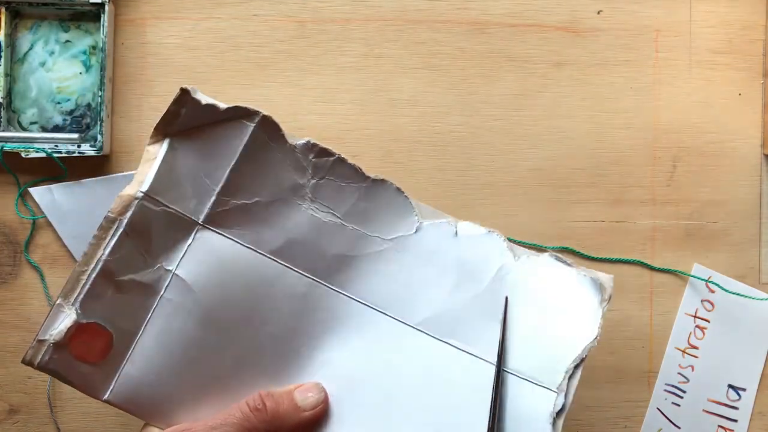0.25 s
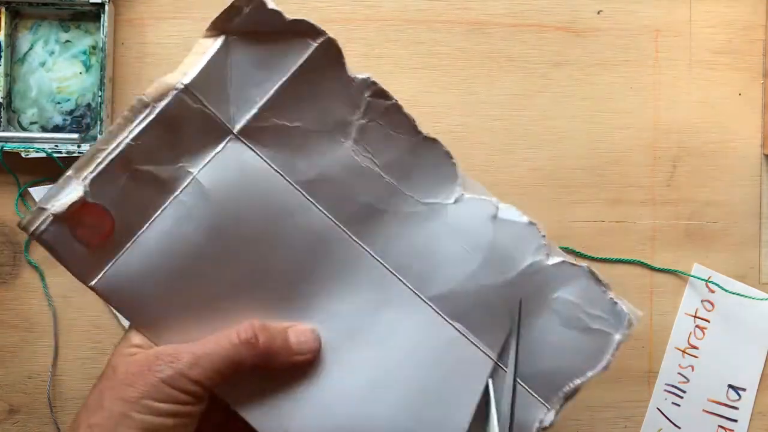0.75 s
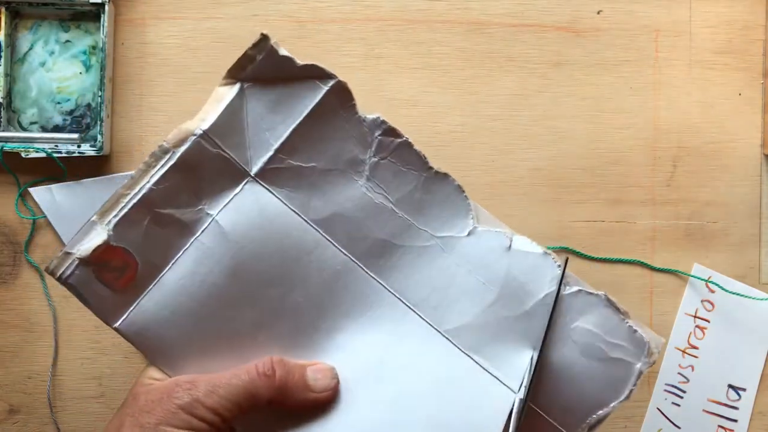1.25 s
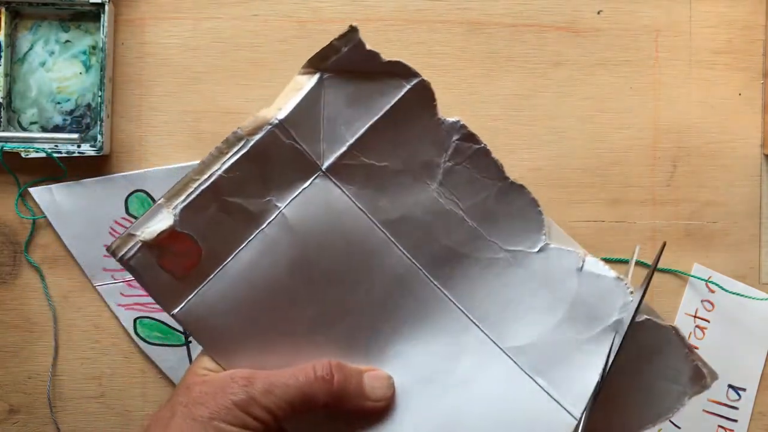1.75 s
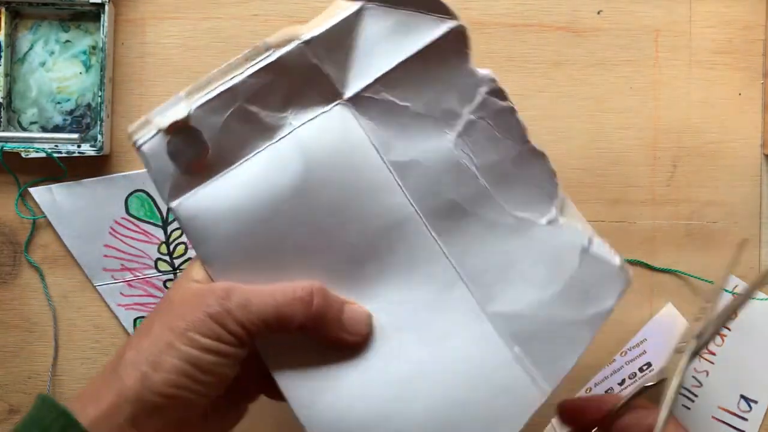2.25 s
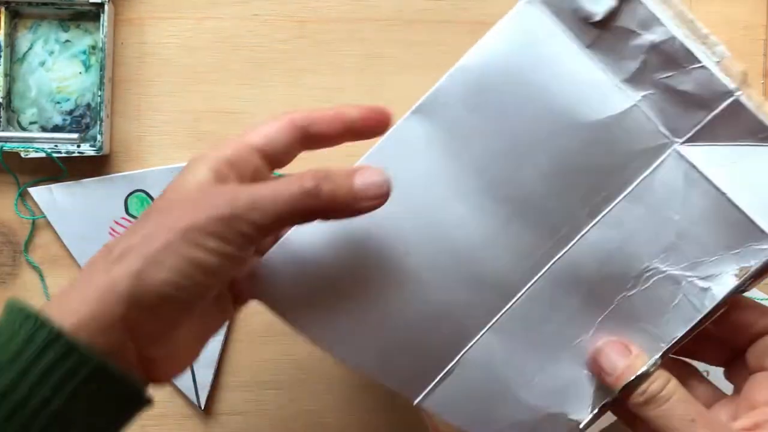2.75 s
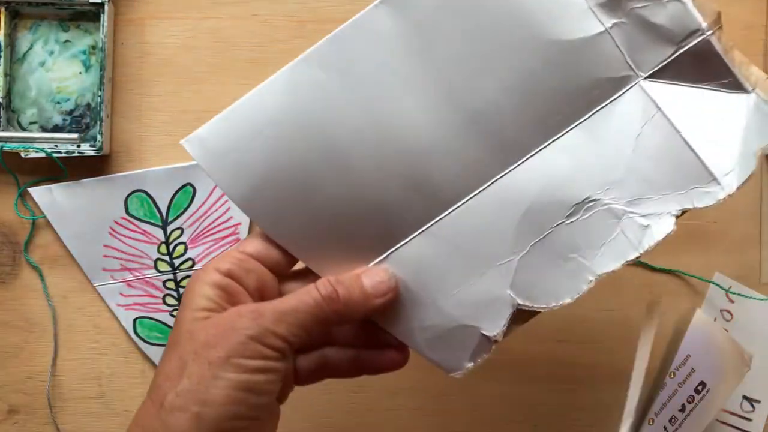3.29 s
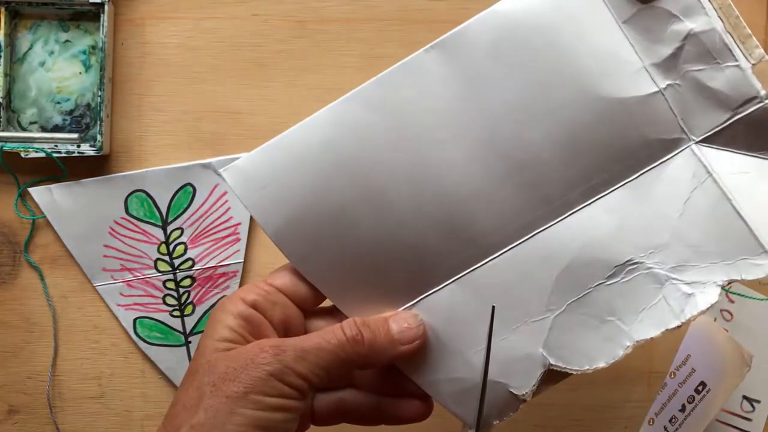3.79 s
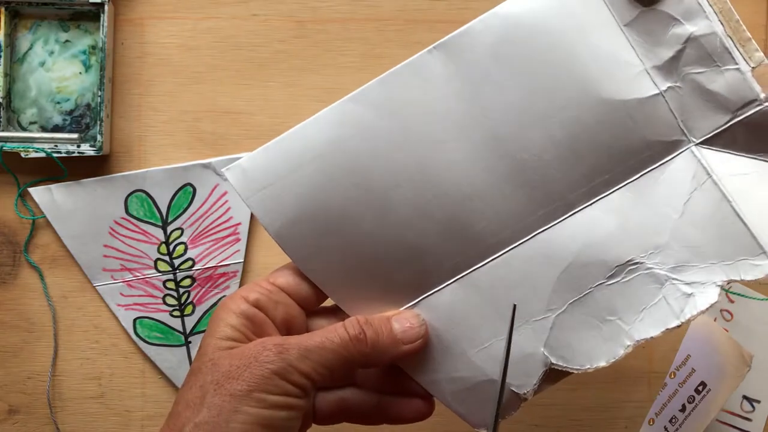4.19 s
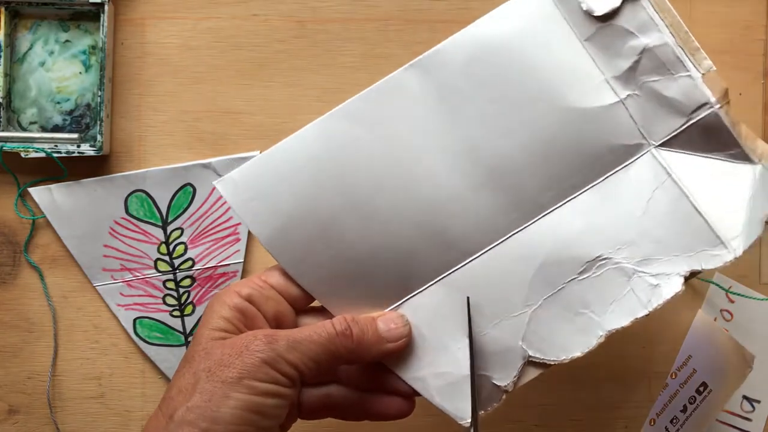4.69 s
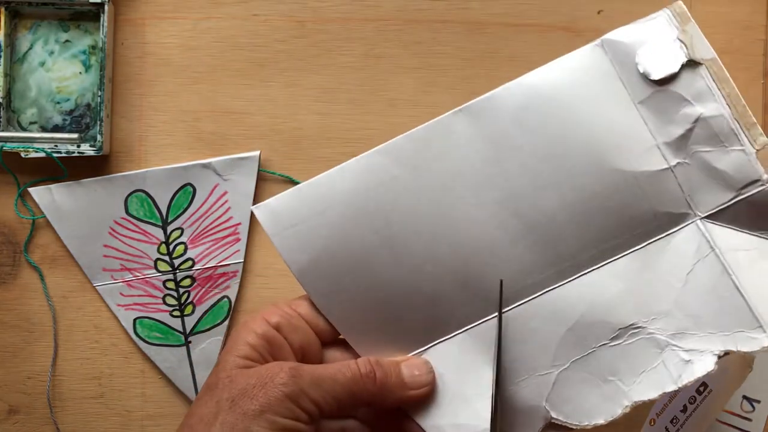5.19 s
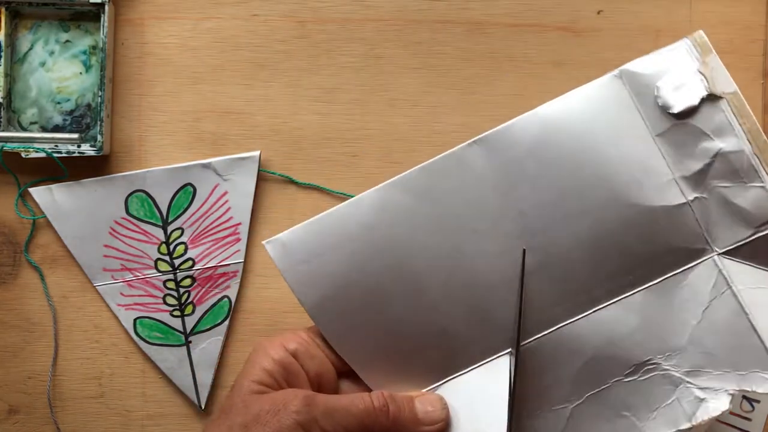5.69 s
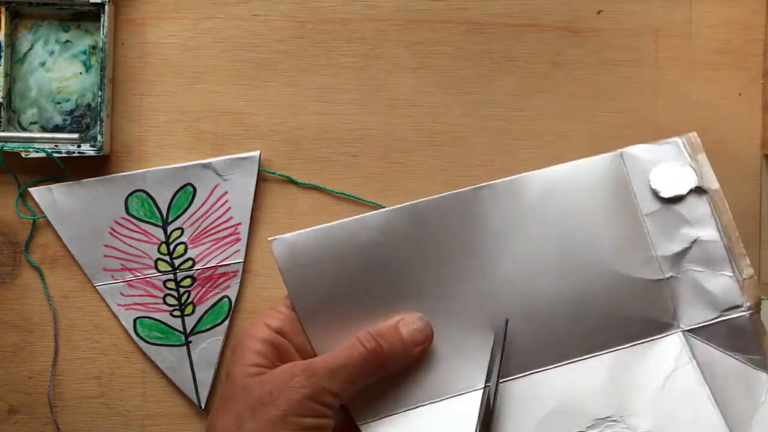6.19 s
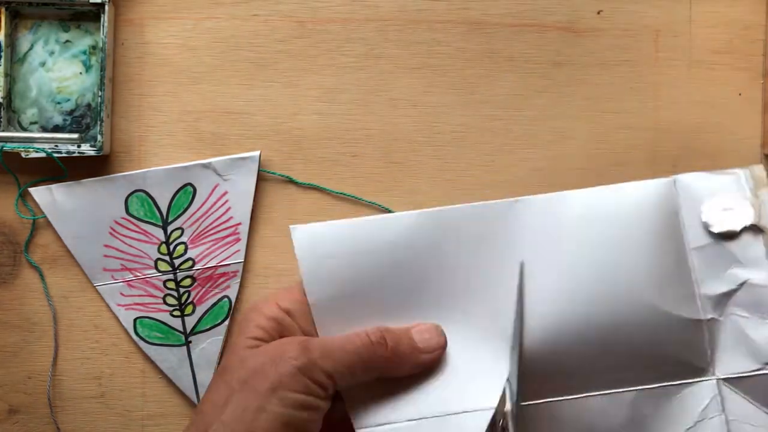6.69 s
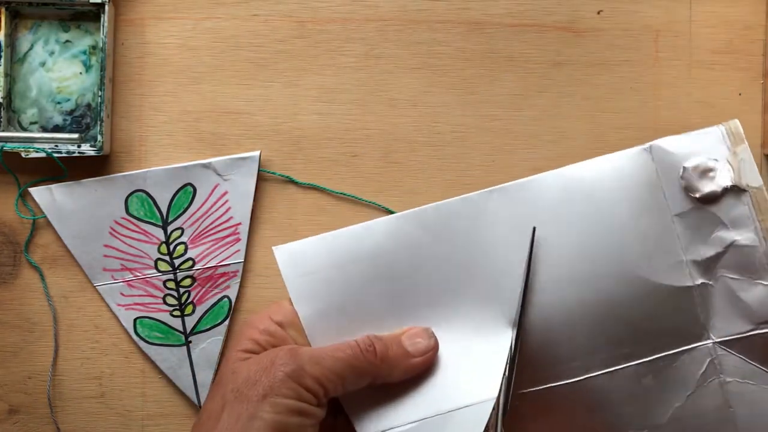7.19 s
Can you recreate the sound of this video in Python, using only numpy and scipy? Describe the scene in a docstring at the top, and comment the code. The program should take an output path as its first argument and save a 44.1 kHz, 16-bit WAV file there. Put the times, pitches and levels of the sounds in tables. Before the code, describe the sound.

A close indoor take of scissors cutting stiff folded carton over a wooden table. From 0 to 0.25 s a rapid cluster of sharp crackles tears forward, then more short crunches and dry scrapes around 0.4 to 1 s. Stronger crackles come at 1.35 to 1.5 s and again near 1.9 s. At 2.1 s the blades snap shut, very loud, bright and steely, followed by hollow wooden knocks and low thumps until 2.3 s. Handling rustles at 2.6 s; the sheet bumps the table around 2.95 to 3.1 s. It is sparse and quiet until 4.5 s, when crunching returns, with a dense burst at 5.2 to 5.35 s. Scrapes and crackles continue, a smaller snip and thump land at 6.2 s, rubbing follows, and a final crackling flurry runs 7.2 to 7.4 s. Faint rapid ticking and a low hush persist.

```python
"""Quick crackling jerks and dry scraping open the scene: scissors cut stiff folded carton above a wooden table.
Noise bursts through card resonances make the tearing; gusty grit through the same card makes the scrape.
The blades snap shut twice as ringing steel, and the sheet knocks and booms on the table's modes.
Behind it lie a small room's short tail, a faint steady ticking and a bass-heavy hush."""
import sys
import numpy as np
from scipy import signal
from scipy.fft import rfft, irfft
from scipy.io import wavfile
from scipy.ndimage import uniform_filter1d

SR = 44100
rng = np.random.default_rng(int(sys.argv[2]) if len(sys.argv) > 2 else 0)


def unload_audio(sound):
    """Save the sound as a 16-bit wav file, at the path given as the first command line argument."""
    columns = np.transpose(np.atleast_2d(sound))
    # keep every value between -1 and 1, then stretch to whole-number steps
    steps = np.round(np.clip(columns, -1, 1) * 32767)
    wavfile.write(sys.argv[1], SR, steps.astype(np.int16))


N = 328545


def undb(db):
    """Gain of a level in dB."""
    return 10 ** (np.asarray(db) / 20)


def ring(x, hz, width_hz):
    """One resonance, gain 1 at its centre."""
    return signal.lfilter(*signal.iirpeak(hz, hz / max(width_hz, 5), fs=SR), x)


def body(x, modes):
    """A struck or rubbed object: a bank of resonances with alternating sign."""
    out = np.zeros(len(x))
    for k, (hz, width_hz, db) in enumerate(modes):
        out += (-1) ** k * undb(db) * ring(x, hz, width_hz)
    return out


def patchy(x, modes, depth_db, rate):
    """A bank of resonances whose levels wander apart as grip and bend change."""
    out = np.zeros(len(x))
    for k, (hz, width_hz, db) in enumerate(modes):
        wandering = undb(db + depth_db * walk(rate))
        out += (-1) ** k * wandering * ring(x, hz, width_hz)
    return out


def rms(x, db=0):
    """Scale to an rms level in dB."""
    return x * undb(db) / np.sqrt(np.mean(x ** 2))


def peak(x, db):
    """Scale to a peak level in dB."""
    return x * undb(db) / np.max(np.abs(x))


def dull(x, hz, order=2):
    """Low-pass."""
    return signal.sosfilt(signal.butter(order, hz, fs=SR, output="sos"), x)


def walk(rate):
    """Random levels held for 1 / rate seconds, then slewed into ramps; spread a little under 1."""
    hold = int(SR / rate)
    steps = np.repeat(rng.standard_normal(N // hold + 1), hold)
    return uniform_filter1d(steps, hold)[:N]


def push(noise, ms):
    """Noise under a rounded swell that lasts about ms."""
    u = np.arange(len(noise)) / SR / (max(ms, .2) / 2500)  # 1 at the top of the swell
    return noise * (u * np.exp(1 - u)) ** 2


def add(out, s, x):
    """Mix x into out from time s."""
    i = int(s * SR)
    out[i:i + len(x)] += x[:len(out) - i]


# The cut jerks forward. Each row: start in seconds, crackle level in dB, panel pitch in Hz,
# panel level in dB over the crackle, tear length in ms.
JERKS = [(0.0495, -22.5, 780, -2.5, 12), (0.063, -17.5, 710, -6.5, 7.5), (0.0824, -25, 730, -4, 5.2),
         (0.0947, -18, 763, -0.5, 8.4), (0.1222, -14, 749, 9, 8.4), (0.1605, -12, 758, -3, 3.95),
         (0.211, -19.5, 537, -10, 5.9), (0.4344, -17, 534, -30, 1.74), (0.4484, -20.5, 1250, -8, 5.3),
         (0.4936, -17, 512, -8, 7.7), (0.5814, -33, 543, -5, 5.5), (0.62, -35.5, 1190, -6, 5.6),
         (0.7264, -40, 715, 6.5, 4.9), (0.9707, -30, 654, -6.5, 2.1), (1.0025, -26.5, 750, -7, 14.5),
         (1.3384, -24.5, 745, -10, 10), (1.3747, -17.5, 723, -10, 6), (1.3942, -18, 750, -6, 11.3),
         (1.4454, -10.5, 1084, -10, 10.4), (1.4775, -30.5, 730, 1.5, 5.8), (1.6658, -22.5, 610, -6.5, 6.9),
         (1.9135, -21, 700, -12.5, 10.4), (1.9466, -18.5, 784, -1.5, 5.7), (1.9724, -30, 750, -22, 4.2),
         (2.6538, -27.5, 770, -2, 10), (3.0811, -32, 580, -7.5, 5), (3.5822, -37, 690, -10, 8.4),
         (4.138, -42, 743, 1, 5.3), (4.5096, -25.5, 720, -22, 5.5), (4.5381, -29, 680, -7.5, 8.5),
         (4.568, -35, 670, -5.5, 8), (4.6069, -30.5, 775, -13, 11), (4.6808, -21, 720, 1, 11.8),
         (4.6917, -21.5, 739, 2.5, 7.6), (4.7234, -28, 1107, -14, 7.4), (5.1672, -63, 684, 0, 6),
         (5.226, -23, 740, -8, 8.6), (5.2472, -15, 1140, -36, 6.1), (5.2614, -18.5, 760, -2.5, 21),
         (5.2744, -16.5, 744, -2.5, 5.8), (5.2909, -10, 764, -9.5, 9.1), (5.3163, -20, 1040, -5, 2.6),
         (5.3353, -18.5, 1130, -0.5, 7.4), (5.585, -25.5, 1110, -5, 2.7), (5.8356, -18, 705, -14, 8.4),
         (5.91, -16, 1006, -0.5, 5.2), (5.9455, -21, 757, -4.5, 8.3), (6.0112, -32, 740, -8, 4),
         (6.0273, -23, 525, -15.5, 6.2), (6.1386, -26.5, 510, -1, 4.1), (6.356, -38.5, 525, 0, 4.7),
         (6.4268, -32.5, 740, -10, 5.1), (7.1761, -18, 660, -10.5, 5.8), (7.215, -29, 790, -16, 6.9),
         (7.2426, -18.5, 710, -10, 8.7), (7.28, -21.5, 770, -8.5, 7.1), (7.3282, -24.5, 764, 0, 3.6),
         (7.352, -12.5, 550, -10.5, 5.3), (7.3796, -23, 750, 8.5, 3.4), (7.4026, -27, 765, 8.5, 5.2)]
# Resonances of the stiff card. Each row: centre in Hz, width in Hz, level in dB.
CARD_MODES = [(1653, 830, -4), (2324, 53, 5.5), (2580, 75, -5.5), (3470, 575, 5.5), (3890, 1370, 1.5),
              (6600, 2320, -4.5), (8450, 830, -3)]
# Resonances of the free carton panel. Each row: centre in Hz, width in Hz, level in dB.
PANEL_MODES = [(672, 179, -1), (741, 78, 3.5), (1119, 140, -6.5), (390, 270, -6.5), (206, 140, -8)]
# The card's brightest pitch drifts with where it is held and cut. Each row: time in seconds, pitch in Hz.
BRIGHT_PITCH = [(0, 6140), (0.25, 4810), (0.45, 3240), (1.2, 2870), (2, 2240), (2.6, 4110), (3, 2110),
                (5, 2220), (7.45, 2054)]
BRIGHT_SCATTER = .2  # each jerk lands about this share off the brightest pitch
CARD_TOP_HZ = 8970


def bright_hz(s):
    """The card's brightest pitch in Hz at time s, gliding between the listed points."""
    return np.interp(s, *np.transpose(BRIGHT_PITCH))


def slips():
    """Each jerk tears fibres for a few ms; the card crackles and the free panel rings."""
    out = np.zeros(N)
    noises = rng.standard_normal((len(JERKS), 4096))
    for (s, db, panel_hz, panel_db, ms), noise in zip(JERKS, noises):
        hz = bright_hz(s) * np.exp(BRIGHT_SCATTER * noise[-2])  # a late noise sample serves as the scatter
        tear = push(noise, ms)
        crackle = peak(body(tear, CARD_MODES), 0) + peak(ring(tear, hz, hz / 6), -0.25)
        crackle = crackle + peak(body(tear, PANEL_MODES[3:]), -18.0)  # a little low body
        panel_note = ring(ring(tear, panel_hz, 270), panel_hz, 84)
        panel = peak(panel_note, 0) + peak(body(tear, PANEL_MODES[:3]), -5.0)
        add(out, s, peak(crackle, db) + peak(panel, db + panel_db))
    return dull(out, CARD_TOP_HZ, order=3)


# Blades and fingers rub the card. Each row: start in seconds, firmest moment in seconds, end in seconds,
# hiss level in dB at the firmest, panel level in dB over the hiss.
RUBS = [(0, 0.026, 0.06, -50.5, -7), (0.04, 0.063, 0.24, -43, -8), (0.364, 0.418, 0.43, -51.5, 1),
        (0.422, 0.441, 0.485, -31, -5), (0.473, 0.487, 0.545, -43, 4.5), (0.638, 0.667, 0.667, -34, -12),
        (0.664, 0.673, 0.78, -36.5, -6), (0.76, 0.791, 0.9, -37, -3.5), (0.888, 0.923, 0.937, -40.5, -3.5),
        (0.939, 0.975, 0.99, -44.5, -1.5), (0.982, 1.015, 1.145, -43.5, -1.5),
        (1.171, 1.193, 1.215, -49.5, -1.5), (1.22, 1.258, 1.31, -45, -2), (1.316, 1.34, 1.38, -45.5, -4),
        (1.445, 1.475, 1.51, -57, 8), (1.632, 1.649, 1.83, -46.5, 1), (1.899, 1.98, 1.99, -36, -1.5),
        (2.215, 2.356, 2.45, -53.5, -2.5), (2.567, 2.586, 2.62, -48, -2), (2.607, 2.64, 2.785, -43, -10),
        (2.938, 2.955, 3.22, -43.5, 0.5), (3.577, 3.624, 3.76, -52, -4.5), (3.914, 3.928, 3.95, -58, -9),
        (4.07, 4.091, 4.11, -53.5, -3.5), (4.129, 4.16, 4.25, -55, -1), (4.298, 4.517, 4.59, -46.5, -5),
        (4.597, 4.646, 4.67, -43, -3.5), (4.656, 4.704, 4.76, -43, 0.5), (4.911, 4.958, 5.07, -39.5, -11),
        (5.032, 5.099, 5.14, -52.5, 6), (5.156, 5.204, 5.23, -51.5, -2), (5.215, 5.28, 5.4, -37, -2.5),
        (5.535, 5.578, 5.66, -36.5, -6.5), (5.656, 5.736, 5.775, -49, 4.5), (5.79, 5.826, 5.84, -49.5, -5),
        (5.828, 5.862, 5.91, -34, -5), (5.876, 5.934, 5.97, -35.5, 1.5), (6.004, 6.05, 6.11, -39.5, -8.5),
        (6.081, 6.126, 6.15, -37.5, -3), (6.149, 6.201, 6.233, -40.5, 7), (6.22, 6.293, 6.43, -52, 11),
        (6.429, 6.465, 6.492, -38.5, 2.5), (6.507, 6.596, 6.62, -45, 0.5), (6.611, 6.662, 6.7, -48, 4),
        (6.676, 6.743, 6.84, -36, 0.5), (6.8, 6.883, 6.93, -48.5, 3.5), (6.93, 6.99, 7.06, -47.5, -0.5),
        (7.116, 7.143, 7.18, -47.5, -20), (7.159, 7.19, 7.32, -41.5, -3.5), (7.313, 7.38, 7.45, -38.5, 1)]
TOUCH_S, LIFT_S = 0.0075, .015  # contact is made quickly and lost more slowly
SWELL_DB, FADE_DB = 10, 13.5  # how far under its firmest a stroke starts and ends


def scrape():
    """Dense tiny fibre clicks of uneven size, in gusts, coloured by card and panel."""
    gusts_db = 1.8 * walk(900) + 1.3 * walk(90) + .7 * walk(30)
    grit = rng.standard_normal(N) * undb(gusts_db)
    # thick fibres snap well above the rest: about 250 grains a second are six times as strong
    grit = grit * (1 + 5.0 * (rng.random(N) < 250 / SR))
    card = rms(patchy(grit, CARD_MODES, 2.2, 30))
    panel = rms(patchy(grit, PANEL_MODES, 2.2, 22))
    out = np.zeros(N)
    for start, firmest, end, db, panel_db in RUBS:
        hz = bright_hz((start + end) / 2)
        i, j = int(max(start, 0) * SR), min(int(end * SR), N)
        t = np.arange(j - i) / SR
        contact = np.minimum(1, t / TOUCH_S) * np.minimum(1, (t[-1] - t) / LIFT_S)
        pressure_db = np.interp(start + t, [start, firmest, end], [db - SWELL_DB, db, db - FADE_DB])
        hiss = card[i:j] + rms(ring(grit[i:j], hz, hz / 6), -7)
        rub = rms(hiss) + undb(panel_db) * panel[i:j]
        out[i:j] += contact * undb(pressure_db) * rub
    return dull(out, CARD_TOP_HZ, order=3)


# The blades snap shut. Each row: start in seconds, snap level in dB, then panel, last fibres and shiver,
# each in dB over the snap level.
SNAPS = [(2.0991, 8.5, -20.5, -20, -21.5), (6.2129, -1.5, -13, -8.5, -22.5)]
# Resonances of the steel blades. Each row: centre in Hz, width in Hz, level in dB.
BLADE_MODES = [(2010, 880, -10), (3600, 200, -13.5), (4490, 770, -2), (6260, 770, -5.5), (7740, 2200, -7),
               (8300, 5500, -16.5), (14300, 1000, -25.5)]


def snips():
    """The last fibres give way just before the steel meets; blades and panel ring, the freed sheet shivers."""
    out = np.zeros(N)
    t = np.arange(8192) / SR
    noises = rng.standard_normal((len(SNAPS), 3, len(t)))
    for (s, db, panel_db, fibre_db, shiver_db), noise in zip(SNAPS, noises):
        fibres = dull(body(push(noise[0], 12.0), CARD_MODES), CARD_TOP_HZ)
        add(out, s, peak(fibres, db + fibre_db))
        blow = push(noise[1], .7) + 0.12 * push(noise[1], 5.5)
        blades = peak(body(blow, BLADE_MODES), db + 1.5)
        panel = peak(body(blow, PANEL_MODES), db + panel_db)
        # the shiver falls 60 dB in 0.17 s, fluttering on the way
        flutter = undb(-60 * t / 0.17 + 4.1 * walk(130)[:len(t)])
        shiver = dull(ring(noise[2], 3500, 8800), 9700, order=4) * flutter
        add(out, s + 0.006, blades + panel + peak(shiver, db + shiver_db))
    return out


# The sheet knocks on the table. Each row: start in seconds, peak level in dB, pitch in Hz, contact in ms.
SHEET_KNOCKS = [(2.168, -9.5, 491, 11.7), (2.181, -17, 260, 6.5), (2.261, -14, 502, 14.5),
                (2.293, -23, 508, 5.8), (2.314, -34, 477, 14), (2.946, -14.5, 521, 14.4),
                (2.973, -14, 474, 6.2), (3.033, -29, 280, 22.3), (6.224, -19.5, 392, 9),
                (6.301, -27, 318, 10)]
# Resonances of the wooden table. Each row: centre in Hz, width in Hz, level in dB.
TABLE_MODES = [(177, 77, 0), (308, 51, 4.5), (489, 38, 11), (677, 90, 4), (1790, 800, -15.5)]
# Sheet and hands thump the table top. Each row: start in seconds, peak level in dB, push length in ms.
THUMPS = [(1.385, -38.5, 41), (1.427, -59, 22), (1.912, -41, 64), (2.105, -26, 38), (2.171, -13.5, 10),
          (2.273, -19.5, 14), (2.296, -33, 94), (2.954, -28.5, 54), (3.008, -23, 38), (3.064, -23, 17.3),
          (3.107, -28, 61), (6.146, -26.5, 17), (6.228, -18, 16.6), (6.243, -26, 51), (6.545, -37, 10),
          (6.622, -40, 29), (7.23, -34.5, 30), (7.345, -37, 25)]
BOOM_HZ = 103.3


def table():
    """Knocks ring the table's modes and rumble on; slower pushes swing its lowest modes."""
    out = np.zeros(N)
    noises = rng.standard_normal((len(SHEET_KNOCKS), 8192))
    for (s, db, hz, ms), noise in zip(SHEET_KNOCKS, noises):
        blow = push(noise, ms) + 0.14 * push(noise, 5.4 * ms)
        # the bent sheet adds its own note to the table's
        note = peak(ring(ring(blow, hz, 29.6), hz, 260), 0)
        wood = peak(dull(body(blow, TABLE_MODES), 2700), 7.5)
        add(out, s, peak(note + wood, db))
    noises = rng.standard_normal((len(THUMPS), 16384))
    for (s, db, ms), noise in zip(THUMPS, noises):
        shove = push(noise, ms)
        boom = peak(ring(ring(shove, BOOM_HZ, 16.8), BOOM_HZ, 54), 0)
        deep = peak(ring(ring(shove, 45, 26), 45, 40), -12.5)
        add(out, s, peak(boom + deep, db))
    return out


TICK_FIRST_S, TICK_PERIOD_S, TICK_DB = .0422, .05, -47  # typical peak level


def ticking():
    """A faint bright tick at a steady rate: short noise puffs through a broad treble resonance."""
    out = np.zeros(N)
    times = np.arange(TICK_FIRST_S, N / SR, TICK_PERIOD_S)
    for s, noise in zip(times, rng.standard_normal((len(times), 512))):
        tick = ring(ring(push(noise, 2.5), 3600, 3500), 3600, 4000)
        add(out, s, peak(tick, TICK_DB + 1.5 * noise[0]))  # levels vary a little
    return out


ROOM_T60_S, ROOM_DB = 0.16, -15.5  # time to fall 60 dB, tail energy against the direct sound


def room(x):
    """A short diffuse tail, duller than the direct sound: decaying noise convolved with it."""
    t = np.arange(SR // 2) / SR
    build_up = 1 - np.exp(-t / 0.0024)
    tail = rng.standard_normal(len(t)) * undb(-60 * t / ROOM_T60_S) * build_up
    tail = ring(tail, 1100, 11000)
    tail = tail * undb(ROOM_DB) / np.sqrt(np.sum(tail ** 2))
    return signal.fftconvolve(x, tail)[:N]


# Spectrum shape of the hush. Each row: frequency in Hz, relative level per Hz in dB.
HUSH_SHAPE = [(21, -61), (35, -16.5), (65, -3), (97, -3), (162, -9.5), (219, -19), (276, -18), (448, -22),
              (987, -29), (1150, -32), (1410, -31.5), (7400, -34), (15500, -44)]
HUSH_DB = -53  # rms


def hush():
    """Steady room and microphone noise, strongest in the bass: white noise shaped in its spectrum."""
    f = np.maximum(np.fft.rfftfreq(N, 1 / SR), 1)
    hz, db = np.transpose(HUSH_SHAPE)
    shape = undb(np.interp(np.log(f), np.log(hz), db))
    return rms(irfft(rfft(rng.standard_normal(N)) * shape, N), HUSH_DB)


# Bands that the echo off the table top cancels. Each row: centre in Hz, width in Hz.
ECHO_DIPS = [(950, 110), (1550, 76)]


def scene():
    """Cutting and ticking with the room's tail, snaps, the table echo's dips, then table and hush."""
    near = slips() + scrape() + ticking()
    near = near + room(near) + snips()
    for hz, width_hz in ECHO_DIPS:
        near = near - .9 * ring(near, hz, width_hz)
    return (near + table() + hush())[None]


TOP_HZ = 15800


def record(dry):
    """The microphone drops the deepest bass, the loudest snaps clip, the top is cut."""
    no_rumble = signal.sosfilt(signal.butter(5, 38, "high", fs=SR, output="sos"), dry)
    clipped = np.clip(no_rumble, -1, 1)
    return signal.sosfilt(signal.ellip(8, .2, 30, TOP_HZ, fs=SR, output="sos"), clipped)


dry = scene()
out = record(dry)
unload_audio(out)
```